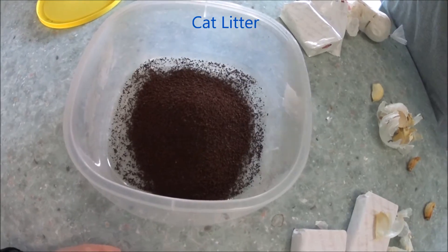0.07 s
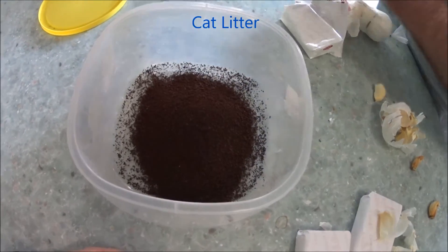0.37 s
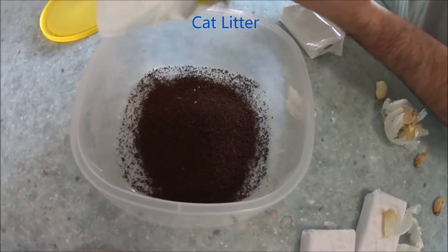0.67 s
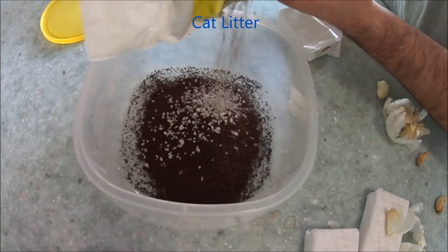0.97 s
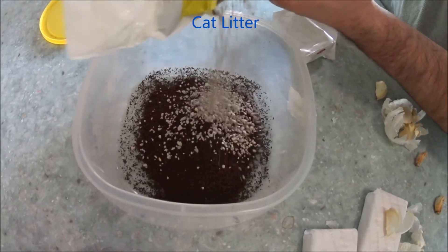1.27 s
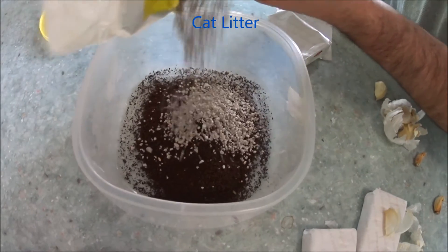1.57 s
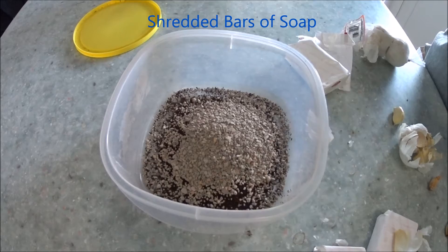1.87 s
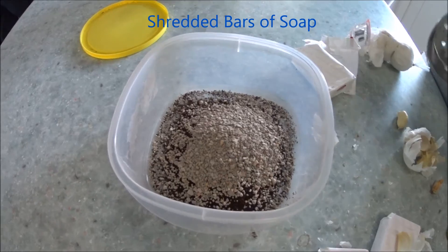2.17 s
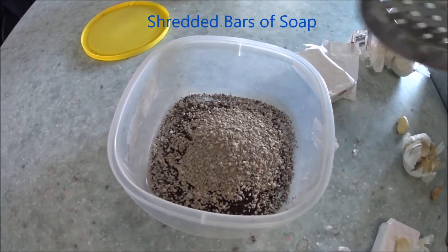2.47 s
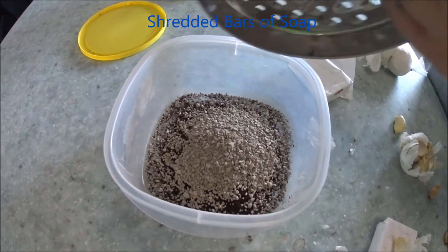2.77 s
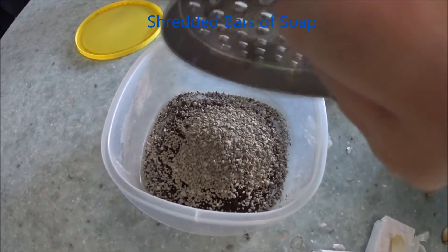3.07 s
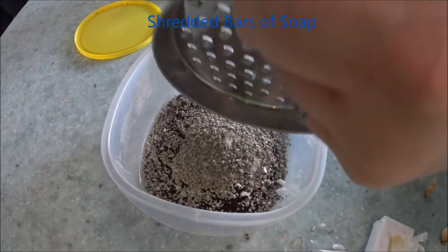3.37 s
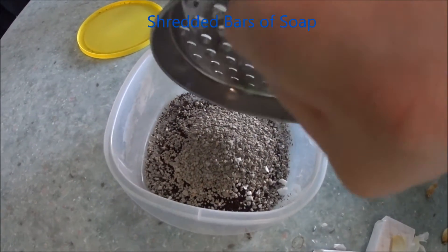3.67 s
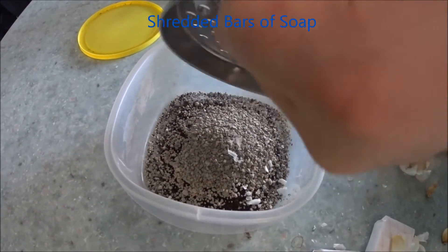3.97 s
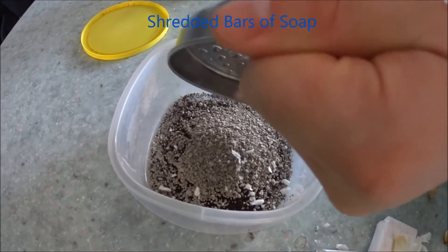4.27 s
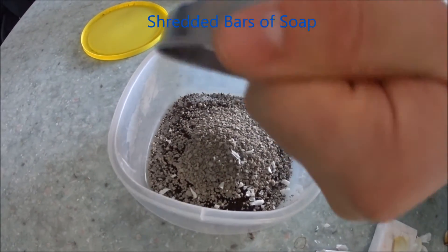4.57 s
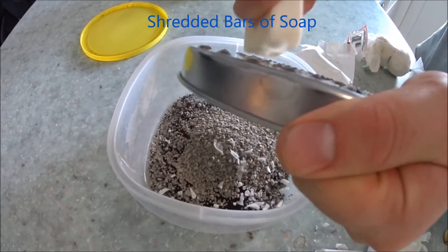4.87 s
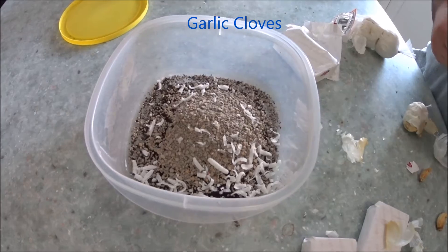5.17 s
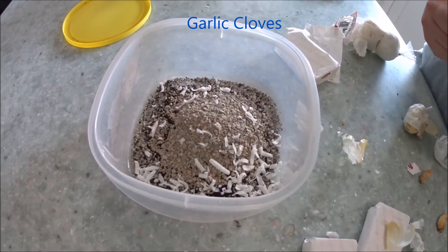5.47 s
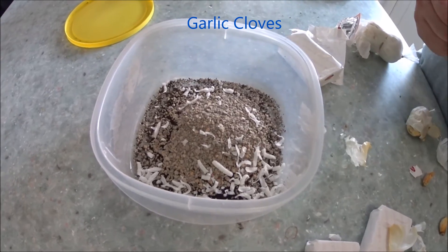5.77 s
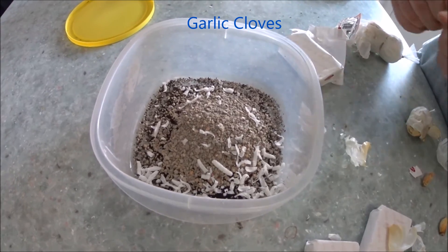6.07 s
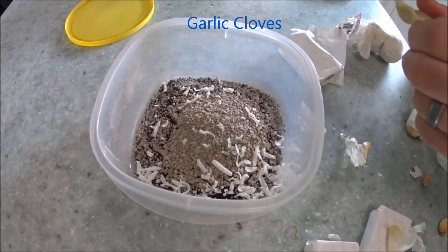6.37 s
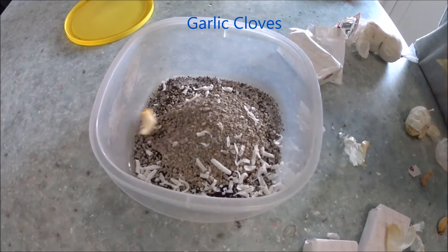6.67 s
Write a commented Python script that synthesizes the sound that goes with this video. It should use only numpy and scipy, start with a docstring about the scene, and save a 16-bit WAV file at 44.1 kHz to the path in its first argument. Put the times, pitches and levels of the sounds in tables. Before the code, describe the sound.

Dry granules pour into a plastic tub, then soap taps and rasps on a ringing steel grater, and garlic skin crackles briefly.

```python
"""A kitchen counter in a small, quiet room, heard close in stereo over ventilation and appliance hum.
Cat litter pours from a box into a plastic tub of coffee grounds, a rain of tiny impacts; stray pellets
tick on the wall. A soap bar is tapped and rubbed on a steel grater over the tub: the plate rings, the
soap tears and squeaks, crumbs fall. Last, a garlic clove is picked up, skin crackling, and dropped in."""
import sys
import numpy as np
from scipy import signal
from scipy.fft import rfft, irfft, next_fast_len
from scipy.io import wavfile

SR = 44100
rng = np.random.default_rng(int(sys.argv[2]) if len(sys.argv) > 2 else 0)


def wav_record(signal):
    """Record a signal, one row per channel, as 16-bit PCM in the file named by sys.argv[1]."""
    frames = np.transpose(np.atleast_2d(signal))
    bounded = np.clip(frames, -1, 1)
    # unit amplitude maps onto the largest positive 16-bit level
    quanta = np.round(bounded * 32767).astype(np.int16)
    wavfile.write(sys.argv[1], SR, quanta)


N = 305172
TIME = np.arange(N) / SR
BODY_HZ, TREBLE_HZ = 950, 5000
WOBBLE_DEPTH, WOBBLES_PER_S = 0.012, 70.3


def from_db(db):
    return 10 ** (np.asarray(db) / 20)


def unit_rms(x):
    return x / np.sqrt(np.mean(x ** 2) + 1e-20)


def unit_energy(x):
    return x / np.sqrt(np.sum(x ** 2, axis=-1, keepdims=True) + 1e-20)


def at_hz(rows, hz):
    """Table columns interpolated over log frequency."""
    points, *columns = np.transpose(rows)
    return [np.interp(np.log(hz + 1), np.log(points), c) for c in columns]


def add(out, start_s, sound):
    i = int(np.clip(round(start_s * SR), 0, N - 1))
    out[i:i + len(sound)] += sound[:N - i]


def butter(x, hz, kind):
    return signal.sosfilt(signal.butter(2, hz, kind, fs=SR, output="sos"), x + 1e-18)


def convolve(x, response):
    return signal.oaconvolve(x, response)[:len(x)]


def response_of(spectrum, size=4096):
    """Minimum-phase impulse response, unit energy."""
    level_db, = at_hz(spectrum, np.fft.rfftfreq(size, 1 / SR))
    cepstrum = irfft(np.log(from_db(level_db)))[:size // 2]
    cepstrum[0] = 0
    return unit_energy(irfft(np.exp(rfft(2 * cepstrum, size)))[:size // 2])


def shelves(x, body_db=0, treble_db=0):
    body = signal.lfilter(*signal.butter(1, BODY_HZ, fs=SR), x)
    treble = signal.lfilter(*signal.butter(1, TREBLE_HZ, "high", fs=SR), x)
    return x + (from_db(body_db) - 1) * body + (from_db(treble_db) - 1) * treble


def swell(t, rise_s, fall_s):
    """Exponential rise and fall; 1 at t = 0."""
    return np.exp(np.maximum(np.minimum(t / rise_s, -t / fall_s), -30))


def wobble(size):
    """Quick random waver, spread about 1."""
    steps = np.arange(size) * WOBBLES_PER_S / SR
    return np.interp(steps, np.arange(200), rng.standard_normal(200))


def grains(per_s, spread_db, size=N):
    """Random tiny impacts, many weak, few strong; mean power 1."""
    chance = np.clip(per_s / SR, 1e-4, 1)
    strength = unit_rms(from_db(spread_db * np.minimum(rng.exponential(1, size), 4)))
    return strength * rng.choice([-1, 1], size) * (rng.random(size) < chance) / np.sqrt(chance)


def noise_burst(t60_s, size):
    return unit_energy(rng.standard_normal(size) * from_db(-60 * TIME[:size] / t60_s))


def gliding_mode(x, hz, t60_s):
    """Resonator with moving pitch; a unit click rings at height 1."""
    turn = np.exp(2j * np.pi * np.cumsum(hz) / SR)
    pole = from_db(-60 / (t60_s * SR))
    return np.real(turn * signal.lfilter([1], [1, -pole], x / turn))


def mute_after(x, stop_s):
    return x * np.clip((stop_s - TIME) / .002, 0, 1)


# Ventilation spectrum: freq_hz, level_db
VENT_SPECTRUM = [(25, -10), (60, -3.5), (120, -7), (170, 0.2), (280, 1), (450, -4), (850, -1), (2100, -9),
                 (2700, -18.5), (10500, -42)]
# Appliance hum: pitch_hz, level_db
HUM_TONES = [(165, -71), (243, -68.5)]
def room_tone(air_db=-57.5, apart_db=-10.5, hiss_db=-66.5):
    """Steady ventilation, wavering appliance hum, faint hiss."""
    shared, left, right = [convolve(w, response_of(VENT_SPECTRUM)) for w in rng.standard_normal((3, N))]
    air = shared + from_db(apart_db) * np.array([left, right])
    drift_rad = np.cumsum(rng.standard_normal((len(HUM_TONES), N)), axis=1) * 0.01826
    hum = sum(from_db(db) * np.sqrt(2) * np.sin(2 * np.pi * hz * TIME + drift)
              for (hz, db), drift in zip(HUM_TONES, drift_rad))
    hiss = butter(rng.standard_normal((2, N)), 990, "high")
    return from_db(air_db) * air + hum + from_db(hiss_db) * hiss


# Thuds on tub and counter: start_s, level_db, pitch_hz
SOFT_CONTACTS = [(1.027, -20, 313), (1.258, -12, 870), (1.491, -12, 730), (1.562, -24, 234),
                 (2.321, -34.5, 135), (2.596, -36, 194), (3.067, -33, 91), (5.072, -30.5, 192),
                 (6.688, -27, 343)]
def thuds(rise_s=0.0012, rise_cycles=0.11):
    """Soft contacts: a hollow swing, gone in a few cycles."""
    out, t = np.zeros(N), TIME[:4096]
    for start_s, level_db, hz in SOFT_CONTACTS:
        age = t / (rise_s + rise_cycles / hz)
        add(out, start_s, from_db(level_db) * age * np.exp(-age) * np.sin(2 * np.pi * hz * t))
    return out


# Small impacts as picked up: freq_hz, level_db
IMPACT_SPECTRUM = [(40, -46), (120, -26), (260, -16), (450, -15), (900, -4), (1500, 0), (1930, 1.5),
                   (2330, -1), (2520, -10.5), (3100, -9), (3900, -14.5), (4400, -12), (5200, -16),
                   (6300, -12.5), (7500, -14.5), (11000, -15.5)]
def impact_colour(x):
    """Broad, hollow colour of the impacts as picked up, peaking near 2 kHz."""
    return convolve(x, response_of(IMPACT_SPECTRUM))


def tick(body_db, treble_db, crunch_t60_s, crunch_db):
    """Hard contact plus brief crunch, hollow in colour; unit energy."""
    contact = from_db(crunch_db) * noise_burst(crunch_t60_s, 4096)
    contact[0] += 1
    return unit_energy(shelves(impact_colour(contact), body_db, treble_db))


def ticks(hits, gain_db, body_db, crunch_t60_s, crunch_db):
    """Single hard hits; brighter ones have less body."""
    out = np.zeros(N)
    for start_s, level_db, treble_db in hits:
        hit = tick(body_db - 0.97 * treble_db, treble_db, crunch_t60_s, crunch_db)
        add(out, start_s, from_db(level_db + gain_db) * hit)
    return out


# Garlic skin on fingers and tub: start_s, level_db, treble_db
SKIN_CRACKLES = [(5.667, -34, 32), (5.75, -43, 32), (6.137, -46, -1), (6.247, -31.5, -25),
                 (6.332, -38.5, -17), (6.585, -29.5, 3), (6.593, -31.5, 14), (6.669, -24.5, 24),
                 (6.683, -24, 11), (6.782, -31, 25)]
def garlic(snap_db=11, rustle_db=-58.5, landing_s=6.668, landing_db=-41.5):
    """Papery skin crackles and rustles on; the clove lands and stirs the granules."""
    stir = impact_colour(grains(per_s=4600, spread_db=7.5))
    landing = stir + butter(stir, [1900, 3300], "band")
    out = from_db(landing_db) * swell(TIME - landing_s, rise_s=0.016, fall_s=0.043) * landing
    for start_s, level_db, treble_db in SKIN_CRACKLES:
        snap = tick(0, treble_db, crunch_t60_s=0.045, crunch_db=3)
        add(out, start_s, from_db(level_db + snap_db) * snap)
        rustle = unit_rms(shelves(np.roll(stir, rng.integers(N)), treble_db=treble_db))
        out += from_db(rustle_db) * swell(TIME - start_s, rise_s=0.008, fall_s=0.071) * rustle
    return butter(out, 1600, "high")


# Dry soap ticks: start_s, level_db, treble_db
SOAP_TICKS = [(3.195, -27.5, -3), (3.228, -18.5, 2), (3.237, -17, -4), (3.808, -31, 5), (3.973, -29, 14),
              (4.036, -26, -12), (4.249, -18, 24)]
def soap_ticks():
    """Small dry ticks: crumbs landing and a stray catch on the teeth."""
    return ticks(SOAP_TICKS, gain_db=14.5, body_db=-13, crunch_t60_s=0.012, crunch_db=20)


# Soap slipping on steel: peak_s, level_db, pitch_hz
SLIPS = [(3.038, -28, 926), (3.679, -33, 2200), (3.729, -33, 2270), (4.085, -27.5, 2110),
         (4.135, -26.5, 2293), (4.264, -36, 2015)]
def soap_squeaks(glide_octaves_per_s=2.57, size=4096):
    """Brief stick-slip tones, wavering and gliding up or down."""
    out, t = np.zeros(N), TIME[:size] - TIME[size // 2]
    envelope = swell(t, rise_s=0.0027, fall_s=0.01)
    for peak_s, level_db, hz in SLIPS:
        glide = 2 ** (glide_octaves_per_s * rng.uniform(-1.016, 1) * t)
        pitch_hz = hz * glide * (1 + WOBBLE_DEPTH * wobble(size))
        tone = np.sqrt(2) * np.sin(2 * np.pi * np.cumsum(pitch_hz) / SR)
        add(out, peak_s + t[0], from_db(level_db) * envelope * tone)
    return out


def local_ring(t60_s, low_hz=4090, high_hz=9470, count=6):
    """Each contact rings its own patch of steel; default band: single teeth."""
    hz = low_hz * (high_hz / low_hz) ** ((np.arange(count) + rng.random(count)) / count)
    t = TIME[:8192]
    tones = rng.standard_normal(count) @ np.sin(2 * np.pi * np.outer(hz, t))
    return unit_energy(tones * from_db(-60 * t / t60_s))


FLEX_HZ, FLEX_T60_S = 325, 0.22   # lowest plate mode
# Steel grater modes: pitch_hz, level_db, t60_s
GRATER_MODES = [(560.7, -7.5, 0.43), (815, -8.5, 0.3), (935, -3, 0.53), (1147, -4.5, 0.28),
                (1774, 9.5, 0.24), (2014, 2, 0.54), (2180, -8.5, 0.2), (2258, 3.5, 0.38), (2656, -5.5, 0.2),
                (2830, -11.5, 0.92), (3045, -1, 0.1), (3395, -7, 0.25), (3690, -7, 0.167),
                (4344, -8.5, 0.21), (4440, -19, 0.445), (6010, -17.5, 0.3)]
def struck_grater(damping, detune=0.011, scatter_db=6):
    """Each touch excites the modes anew; the bar damps them and bends them upward."""
    hz, level_db, t60_s = np.transpose(GRATER_MODES)[:, :, None]
    strength, shift, phase = rng.standard_normal((3, len(GRATER_MODES), 1))
    t = TIME[:22050]
    # equal added loss: long rings suffer most
    loss = np.maximum(1 / t60_s + (damping - 1) / np.median(t60_s), 1)
    bend = np.cumsum(np.tanh(t / .03)) / SR
    waves = np.sin(2 * np.pi * hz * (t + detune * (shift * t + 2 * bend)) + np.pi * phase)
    envelopes = from_db(level_db + scatter_db * strength - 60 * loss * t)
    return unit_energy(np.sum(envelopes * waves, axis=0))


def rubbed_grater(tears, bend_hz, damping, spot_hz, spot_db=7.5, flex_db=4.5, scatter_db=6):
    """Modes waver and glide under the bar; those near spot_hz answer most, high ones damp most."""
    hz, level_db, t60_s = np.transpose(GRATER_MODES)
    strength, share = rng.standard_normal((2, len(hz)))
    spot_match = np.exp(-(np.log2(hz / spot_hz) / 0.047) ** 2)
    gain = from_db(level_db + scatter_db * strength + spot_db * spot_match)
    pressure = max(damping - 1, 0)
    t60_s = 1 / (1 / t60_s + pressure * np.sqrt(hz / np.median(hz)) / np.median(t60_s))
    modes = 0
    for mode_hz, mode_gain, mode_t60_s, bend_share in zip(hz, gain, t60_s, 0.74 + 0.66 * share):
        waver = 1 + WOBBLE_DEPTH * np.tanh(pressure) * wobble(len(tears))
        modes += mode_gain * gliding_mode(tears, mode_hz * waver + bend_share * bend_hz, mode_t60_s)
    flex = gliding_mode(tears, FLEX_HZ + bend_hz, FLEX_T60_S / np.sqrt(damping))
    flex *= from_db(flex_db) * np.tanh(bend_hz / 70)
    ring_energy = np.sum(gain ** 2 * t60_s) * SR / (4 * np.log(1000))
    return (modes + flex) / np.sqrt(ring_energy)


# Soap on the teeth: freq_hz, level_db
RASP_SPECTRUM = [(150, -19), (380, -14.5), (700, -7.5), (1300, 0), (2100, 3.5), (2500, -10.5), (4000, -16),
                 (7000, -14.5), (11000, -18.5)]
# Bar taps on the grater: start_s, level_db, flex_db, damping_factor
BAR_TAPS = [(2.74, -24, -41, 1.15), (2.840, -23.5, -37, 1.8), (3.472, -28, -34.5, 0.29),
            (3.937, -9, -28, 2), (4.503, -32, -38, 0.86), (4.533, -25.5, -61, 3.2), (5.033, -28, -42, 2.6)]
def soap_taps(ring_db=16.5, crack_db=12, teeth_db=2, flex_rise_per_s=0.5):
    """The teeth crack, the steel rings; the lowest mode rises as the bar leans on the plate."""
    out, colour = np.zeros(N), response_of(RASP_SPECTRUM)
    for start_s, level_db, flex_db, damping in BAR_TAPS:
        ring = struck_grater(damping)
        crack = convolve(noise_burst(t60_s=0.11, size=len(ring)), colour)
        strike = from_db(ring_db) * ring + from_db(crack_db) * crack
        t = TIME[:len(ring)]
        flex_cycles = FLEX_HZ * t * (1 + flex_rise_per_s * t / 2)
        flex = from_db(flex_db - 60 * t / FLEX_T60_S) * np.sin(2 * np.pi * flex_cycles)
        add(out, start_s, from_db(level_db) * strike + flex)
        add(out, start_s, from_db(level_db + teeth_db) * local_ring(t60_s=0.071))
    return butter(out, 120, "high")


# Bar strokes: start_s, length_s, rub_db, bend_hz, damping_factor, spot_hz
BAR_STROKES = [(3.018, 0.11, -29, 29, 3.3, 2614), (3.501, 0.112, -32, 137, 1.9, 1850),
               (3.647, .1, -42, 8, 7.1, 2255), (4.049, 0.081, -35, 92, 2.1, 2360),
               (4.242, 0.075, -40.5, 31, 3.2, 1874), (4.556, 0.092, -33, 82, 3, 3040),
               (4.745, 0.095, -31, 4, 1.32, 2860)]
# Soap catching on a row of teeth: peak_s, level_db, treble_db
TOOTH_CATCHES = [(3.038, -27, 7), (3.063, -26, 7.5), (3.069, -23, 6.5), (3.106, -21, 0.5),
                 (3.51, -29.5, 10), (3.533, -24, 4.5), (3.550, -19.5, 4.5), (3.587, -23, 2),
                 (3.676, -29.5, -9), (3.7168, -28, -1.5), (4.049, -26, 0), (4.081, -17.5, -3.5),
                 (4.129, -26, 1), (4.304, -32, -4), (4.577, -27.5, 7), (4.582, -25, 6.5), (4.62, -19, 0),
                 (4.761, -20.5, -3.5), (4.792, -23, -23), (4.82, -25.5, -25)]
def grating(rasp_db=-1.5, steel_db=-4, plate_db=-2, teeth_db=-14.5,
            rough_db=4, judder_hz=184, judder_db=3, per_s=7000, spread_db=3.5, size=16000):
    """Soap chatters and catches on the teeth; tiny tears sound directly and through the steel."""
    out, colour, t = np.zeros(N), response_of(RASP_SPECTRUM), TIME[:size]
    for start_s, length_s, rub_db, bend_hz, damping, spot_hz in BAR_STROKES:
        progress = np.clip(t / length_s, 0, 1)
        rub = from_db(rub_db + rough_db * wobble(size)) * np.sqrt(np.abs(np.sin(np.pi * progress)))
        judder = unit_rms(from_db(judder_db * np.sin(2 * np.pi * judder_hz * t + wobble(size))))
        contacts = [rub * judder * grains(per_s, spread_db, size)]
        for peak_s, level_db, treble_db in TOOTH_CATCHES:
            if start_s < peak_s < start_s + length_s:
                force = from_db(level_db) * swell(t + start_s - peak_s, rise_s=0.0016, fall_s=0.0084)
                contacts.append(shelves(force * grains(per_s, spread_db, size), treble_db=treble_db))
        tears = sum(contacts)
        rasp = convolve(tears, colour)
        teeth = sum(convolve(c, local_ring(t60_s=0.035)) for c in contacts)
        plate = sum(convolve(c, local_ring(t60_s=0.048, low_hz=449, high_hz=2600)) for c in contacts)
        steel = rubbed_grater(tears, bend_hz * progress, damping, spot_hz) + from_db(plate_db) * plate
        stroke = from_db(rasp_db) * rasp + from_db(steel_db) * steel + from_db(teeth_db) * teeth
        add(out, start_s, stroke)
    return butter(out, 110, "high")


# Stray pellets: start_s, level_db, treble_db
PELLET_HITS = [(0.357, -18, 2.5), (0.875, -12, -1.5), (1.025, -12, -1), (1.205, -21.5, 4),
               (1.299, -17.5, 19), (1.334, -18.5, 26), (1.379, -25, 26), (1.432, -12, 0.5), (1.449, -8, -5),
               (1.490, -11.5, -19), (1.538, -10, -3.5), (1.561, -8.5, -2), (1.669, -13, -4)]
def stray_pellets():
    """Pellets hit the tub wall: small ones bright, big ones dull."""
    return ticks(PELLET_HITS, gain_db=12, body_db=5, crunch_t60_s=0.017, crunch_db=1.5)


# First trickle, then full stream: time_s, level_db
TRICKLE_FLOW = [(0.02, -61.5), (0.134, -55), (0.34, -51)]
STREAM_FLOW = [(0.385, -45), (0.553, -25.5), (0.599, -23.5), (0.983, -39), (1.087, -34), (1.149, -46.5),
               (1.201, -41.5), (1.4, -42)]
# Surges from shaking the box: peak_s, level_db
BOX_SHAKES = [(1.561, -34), (1.68, -39.5), (1.793, -35)]
def litter_pour(gain_db=4.5, per_s=5000, spread_db=3.5, bare_db=-3, heap_db=8.5, masking=0.29):
    """Granules rain into the tub. The heap adds body; a thick stream is denser, louder and masks it."""
    stream_db = np.interp(TIME, *np.transpose(TRICKLE_FLOW + STREAM_FLOW))
    surges = sum(from_db(db) * swell(TIME - s, rise_s=0.032, fall_s=0.031) for s, db in BOX_SHAKES)
    flow = from_db(stream_db) + surges
    thickness_db = 20 * np.log10(flow) + 38
    heap = np.tanh(1.76 * np.cumsum(flow ** 2) / np.sum(flow ** 2))
    body_db = bare_db + (heap_db - bare_db) * heap - masking * thickness_db
    impacts_per_s = per_s * from_db(.3 * thickness_db)
    coarse = butter(grains(impacts_per_s, spread_db), TREBLE_HZ, "low")
    fine = butter(grains(impacts_per_s, spread_db), TREBLE_HZ, "high")
    return shelves(impact_colour(coarse + fine), body_db) * flow * from_db(gain_db)


def kitchen(x, near_db=-9.5, room_db=-12.5, size=32768):
    """Quick reflections off tub and counter, then the room; the sides differ only in treble."""
    sides = np.array([[1], [-1]])

    def reflections(t60_s, delay_s):
        shared = noise_burst(t60_s, size)
        apart = butter(noise_burst(t60_s, size), 2100, "high")
        responses = np.pad(unit_energy(shared + apart * sides), ((0, 0), (int(delay_s * SR), 0)))
        return np.array([convolve(x, response) for response in responses])

    near = reflections(t60_s=0.019, delay_s=.001)
    room = reflections(t60_s=0.59, delay_s=.008)
    # contacts come from different spots, so their treble leans left or right
    pan = .35 * unit_rms(butter(rng.standard_normal(N), 200, "low"))
    scatter = pan * butter(x, 2680, "high") * sides
    return x + scatter + from_db(near_db) * near + from_db(room_db) * room


# Microphone pair: freq_hz, left_minus_right_db, left_lag_rad
MIC_PAIR = [(40, -2, 0.08), (254, 0, 1.62), (1300, 1, 2.71), (1714, -3.5, 3.23), (2240, -17, 4.45),
            (2460, -5, 3.25), (2650, -7, 5.83), (3980, -0.5, 7.03), (5440, 5.5, 6.6), (8000, 10, 5.33),
            (11800, 1, 8.1)]
def microphones(x, lean):
    """Left lags right and each favours its own bands; lean scales the imbalance."""
    size = next_fast_len(N + 4096)
    balance_db, lag_rad = at_hz(MIC_PAIR, np.fft.rfftfreq(size, 1 / SR))
    ratio = from_db(lean * balance_db)
    ports = np.array([ratio * np.exp(-1j * lag_rad), np.ones_like(ratio)])
    ports *= np.sqrt(2 / (1 + ratio ** 2))
    return irfft(rfft(x, size) * ports, size)[:, :N]


def scene():
    """Litter, soap, garlic; the first two stop dead, reverb included."""
    litter = litter_pour() + stray_pellets()
    soap = soap_taps() + grating() + soap_squeaks() + soap_ticks()
    close = mute_after(kitchen(litter), stop_s=1.812)
    close += mute_after(kitchen(soap), stop_s=5.051)
    close += kitchen(garlic() + thuds())
    return microphones(close, lean=0.87) + microphones(room_tone(), lean=0.31)


def record(dry, cutoff_hz=11050):
    """Steep low-pass."""
    return signal.sosfilt(signal.ellip(10, .3, 72, cutoff_hz, fs=SR, output="sos"), dry)


dry = scene()
out = record(dry)
wav_record(out)
```